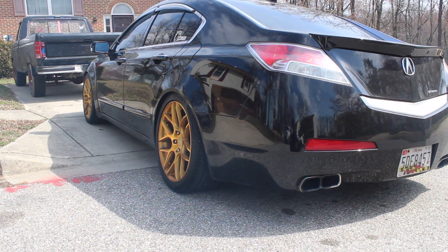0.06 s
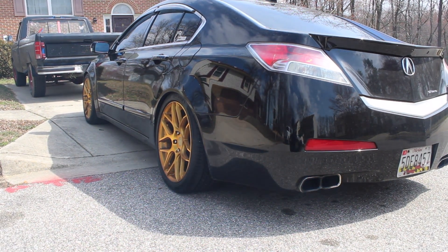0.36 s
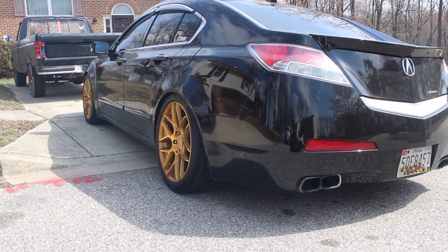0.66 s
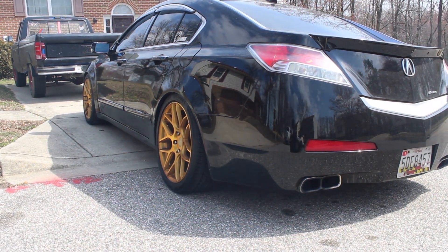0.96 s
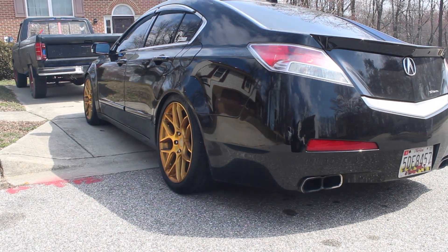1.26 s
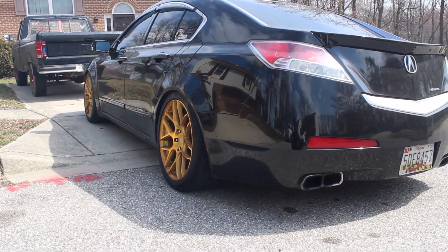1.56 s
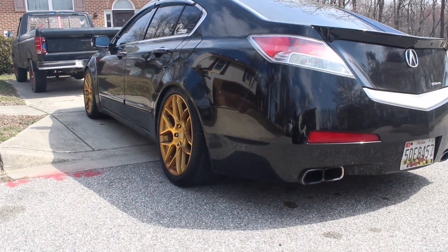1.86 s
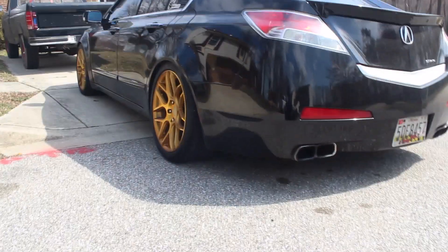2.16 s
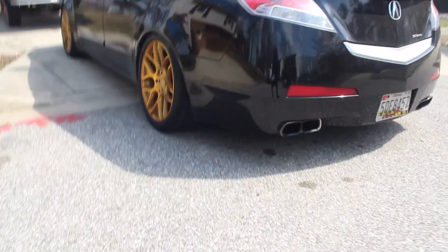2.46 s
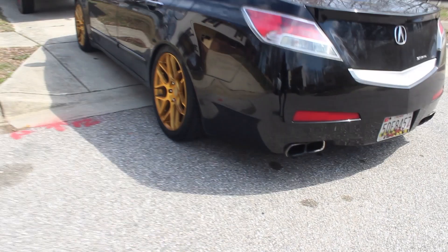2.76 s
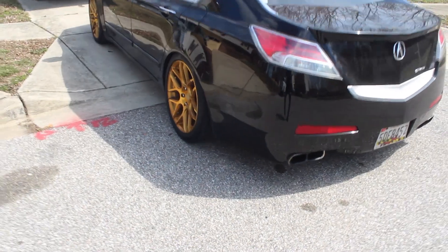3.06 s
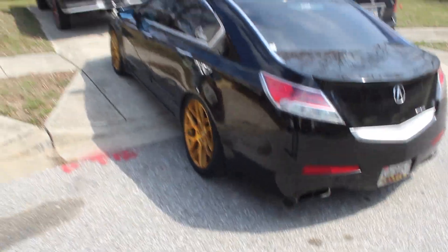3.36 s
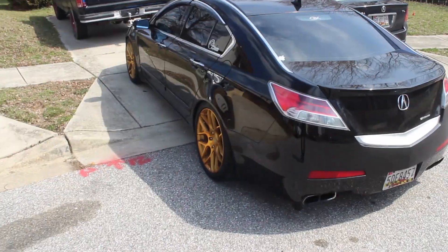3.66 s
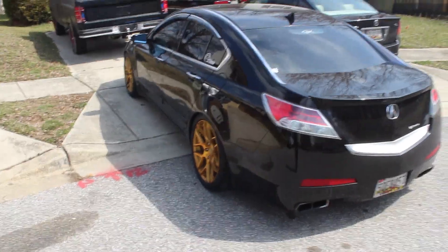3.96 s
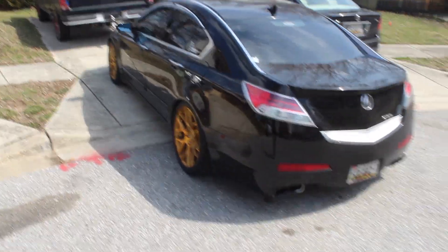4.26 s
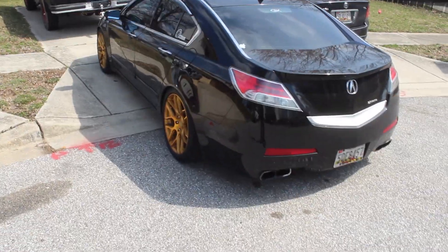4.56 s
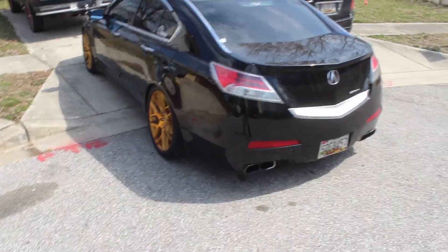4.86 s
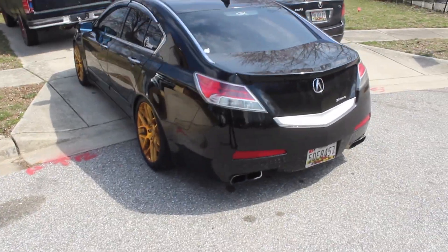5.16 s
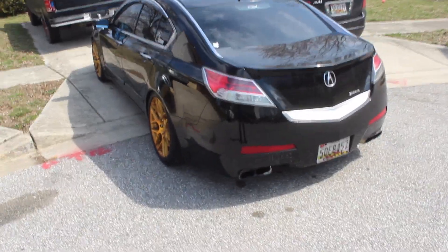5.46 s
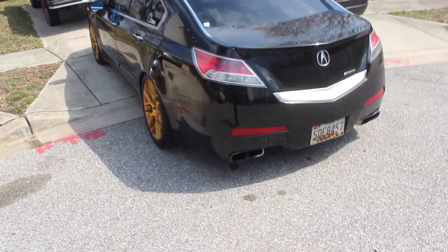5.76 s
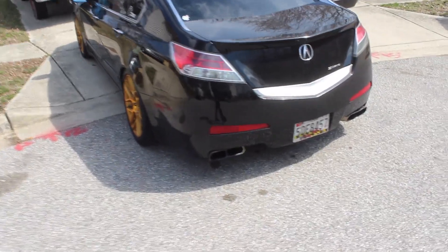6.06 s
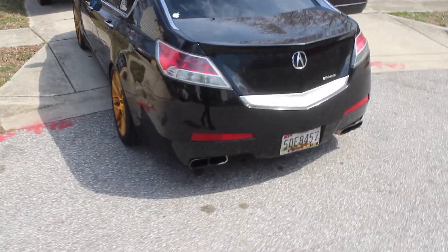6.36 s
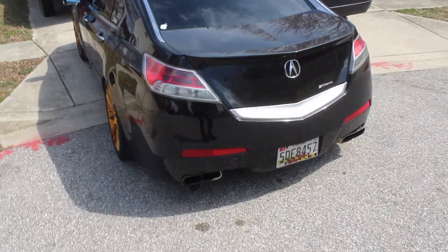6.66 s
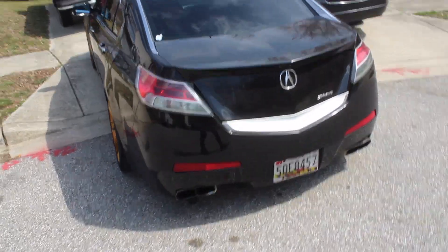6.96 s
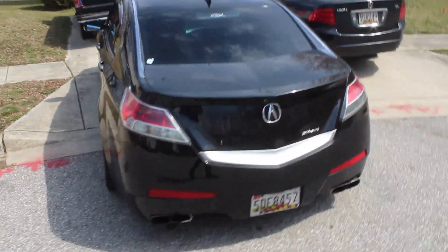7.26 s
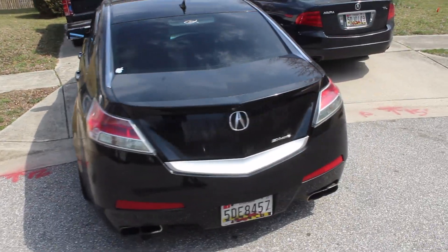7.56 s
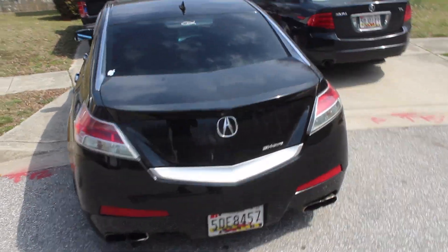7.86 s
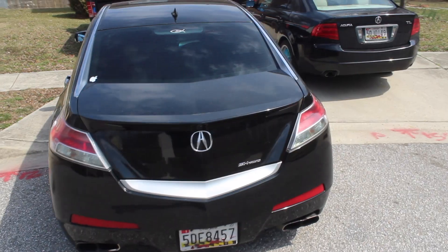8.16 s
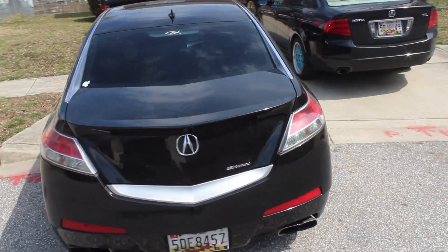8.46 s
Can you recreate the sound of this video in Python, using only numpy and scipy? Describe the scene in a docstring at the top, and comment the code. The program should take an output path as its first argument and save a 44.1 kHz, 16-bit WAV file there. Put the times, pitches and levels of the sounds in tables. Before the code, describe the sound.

A car with an open exhaust falls from a buzzy, crackling throttle blip, its pitch sinking as it goes softer. It catches with a few quick pops and settles into a deep, throaty, pulsing idle. The microphone moves from the side of the car to just behind the tailpipes, where the rasp and hiss get brighter and the chuffs harder. The street around it is quiet.

```python
"""On a quiet street, an open-exhaust V6 drops from a throttle blip, coasts and catches into a fast idle.
Each firing sends a pressure pulse down the pipes. The harmonics of this pulse train make a deep drone,
the pulses ring the modes of the pipes, and turbulent gas leaves the tips as rasp and hiss.
Late charges bang as the engine catches. The listener walks from the side, past the rear corner,
to right behind the tailpipes, where the gas sounds brighter and chuffs harder."""
import sys
import numpy as np
from scipy import signal
from scipy.fft import rfft, irfft, next_fast_len
from scipy.io import wavfile
from scipy.ndimage import uniform_filter1d, map_coordinates

SR = 44100
rng = np.random.default_rng(int(sys.argv[2]) if len(sys.argv) > 2 else 0)


def dump_mix(stems):
    """Bounce the given channels to the path in sys.argv[1] as a 16-bit WAV at rate SR."""
    frames = np.atleast_2d(stems).T  # one column per channel
    limited = np.clip(frames, -1, 1)  # hard clip at full scale
    pcm = np.round(limited * 32767).astype(np.int16)
    wavfile.write(sys.argv[1], SR, pcm)


N = 376173
TIME = np.arange(N) / SR

# The unequal cylinders in firing order: pulse_db, rasp_db, hiss_db, header_delay_s
CYLINDERS = [(0, 2, 15, 0), (-0.5, 0, -12.5, .0001), (-0.5, 0.5, 15, -.0001), (-4, -3.5, -18, .0001),
             (0.5, -2.5, 6, .0001), (-6.5, -2.5, -11, -.0001)]
PULSE_DB, RASP_DB, HISS_DB, HEADER_DELAY_S = np.transpose(CYLINDERS)
# Gas flow against idle, dying away after the blip and returning as the idle catches: time_s, flow_db
GAS_FLOW = [(0, 9.5), (.14, 5.5), (.3, 6.5), (.55, 3.5), (.66, 0), (.88, -5), (1.0, -14.5), (1.3, -10),
            (1.62, -4.5), (2.1, -1), (8.53, 1)]
# Spectra of rasp and hiss at the rear corner: frequency_hz, density_db
RASP_CORNER = [(410, -28), (700, -10), (900, -12.5), (1060, -13), (1200, -2.5), (1400, -2.5), (1700, -2),
               (2300, 1.5), (3600, -5), (4680, -36), (7920, -120)]
HISS_CORNER = [(1880, -30.5), (3200, -14.5), (4060, -2), (4820, -9.5), (5360, -2.5), (6070, -12),
               (6880, -7.5), (8560, -14), (10300, -35.5), (12500, -52), (15500, -84.5)]
LOUD_CYLINDER, LOUD_FIRING_S = 4, 5.879  # the cylinder that barks hardest, and one of its firings
FLARE_S = .0014  # build-up time of a puff of gas


def amp(db):
    """Decibels as an amplitude ratio."""
    return 10 ** (np.asarray(db) / 20)


def unit(x):
    """x scaled to rms 1."""
    return x / np.sqrt(np.mean(x ** 2) + 1e-20)


def steady(x):
    """x with its slow level held at rms 1."""
    power = uniform_filter1d(uniform_filter1d(x * x, SR // 10), SR // 10)
    return x / np.sqrt(np.abs(power) + 1e-20)


def curve(rows):
    """Rows of time_s, value interpolated to every sample."""
    return np.interp(TIME, *np.transpose(rows))


def ramp(start_s, length_s):
    """0 before the start, rising to 1 over the length."""
    return np.clip((TIME - start_s) / length_s, 0, 1)


def bell(x, centre, half_width):
    """A Gaussian bump of height 1."""
    return np.exp(-np.minimum(((x - centre) / half_width) ** 2 / 2, 20))


def wobble(rate_hz):
    """A smooth random curve with rate_hz knots a second."""
    at = np.arange(0, N, SR // 200)
    knots = rng.standard_normal(int(N * rate_hz / SR) + 4)
    return np.interp(np.arange(N), at, map_coordinates(knots, [at * rate_hz / SR]))


def filtered(x, response):
    """x through a complex frequency response."""
    size = next_fast_len(N + SR // 2)
    return irfft(rfft(x, size) * response(np.fft.rfftfreq(size, 1 / SR)), size)[:N]


def coloured(x, spectrum, size=8192):
    """x through a minimum-phase filter drawn as rows of frequency_hz, gain_db."""
    hz, db = np.transpose(spectrum)
    grid_hz = np.fft.rfftfreq(size, 1 / SR)
    gain_db = np.interp(np.log(grid_hz + 1), np.log(hz + 1), np.maximum(db, db.max() - 82.5))
    cepstrum = irfft(np.log(amp(gain_db)))
    cepstrum[1:size // 2] *= 2  # folding the cepstrum makes the filter causal
    cepstrum[size // 2 + 1:] = 0
    return signal.fftconvolve(x, irfft(np.exp(rfft(cepstrum))))[:N]


def viewpoints():
    """Crossfade weights of the side, the corner and behind as the listener walks."""
    # The walk: time_s, place (0 side, 1 corner, 2 or more behind)
    walk = [(0, 0.41), (1, 0.015), (4.4, 0.23), (5.4, 0.87), (6.1, 1.02), (6.7, 1.35), (7.7, 2.08),
            (8.53, 2.6)]
    place = np.clip(curve(walk), 0, 2)
    return [np.maximum(1 - np.abs(place - k), 0) for k in range(3)]


def conditions(surge_db, rise_s):
    """The state: flow in dB, then weights of coasting and of idle low and high at side, corner, behind."""
    idle = ramp(start_s=1.485, length_s=.66)
    high = ramp(rise_s, length_s=.22)  # the listening point is raised
    side, corner, behind = [idle * weight for weight in viewpoints()]
    flow_db = curve(GAS_FLOW) + surge_db
    return np.array([flow_db, 1 - idle, side * (1 - high), side * high, corner, behind])


def gain(levels, state):
    """Amplitude from a slope against gas flow and a level for each weight of the state."""
    return amp(np.dot(levels, state))


def pulses(firings, cylinder_db, scatter_db, jitter):
    """An impulse per firing, sized and delayed by its cylinder and by chance (jitter in intervals)."""
    number = np.arange(np.ceil(firings[0]), firings[-1]).astype(int)
    cylinder = number % len(CYLINDERS)
    timing, strength = rng.standard_normal((len(number), 2)).T
    fired_at = np.interp(number + jitter * timing, firings, np.arange(N))
    at = np.clip(fired_at + HEADER_DELAY_S[cylinder] * SR, 0, N - 2)
    size = amp(cylinder_db[cylinder] + scatter_db * strength)
    whole, fraction = at.astype(int), at % 1
    return np.bincount(whole, size * (1 - fraction), N) + np.bincount(whole + 1, size * fraction, N)


def drone(firings, rate_hz, state, travel_intervals=.68, lag_rad=1.51, waver_db=.66):
    """Resonance: the low orders of the pulse train swell as they cross the exhaust's standing waves."""
    # Standing waves of the whole exhaust: frequency_hz, half_width_hz, lift_db
    standing_waves = [(64.53, 5.18, 24), (103.54, 8.65, 17.5), (135.7, 9.7, 6), (164.6, 5.6, 5.5),
                      (220.4, 16, 9), (266.5, 9.5, 9.5), (306, 9.2, 6), (410, 26, 3)]
    # Multiples of the firing rate, the halves due to the two unequal banks: order
    orders = [1, 1.5, 2, 2.5, 3, 4]
    # Levels before the lift: db_per_flow_db, coast_db, side_low_db, side_high_db, corner_db, behind_db
    order_levels = [(0.54, -35.5, -40.5, -41, -36.5, -37.5), (0.16, -47.5, -62, -63, -58.5, -60),
                    (1, -37.5, -22, -23, -24, -31.5), (0.6, -52, -29, -27, -35.5, -32.5),
                    (0.19, -37, -26.5, -29, -24.5, -31), (0.26, -41, -28.5, -28.5, -25.5, -27)]
    # Single orders swelling briefly during the run-down, the catch and the early idle:
    # centre_s, half_length_s, order, level_db
    swells = [(0.37, 0.082, .5, -32), (0.26, 0.026, 2, -50), (0.777, 0.046, 2, -25),
              (0.743, 0.028, 3, -27.5), (0.853, 0.018, 3, -26), (0.894, 0.056, 4, -28),
              (1.095, 0.1, 5, -30), (1.397, 0.052, 3, -22), (1.53, 0.082, 2, -25.5), (1.82, 0.064, 4, -31),
              (1.74, 0.028, 6, -41), (2.7, .05, 8, -30)]

    def wave(order):
        return -np.sqrt(2) * np.cos(2 * np.pi * order * (firings - travel_intervals) - lag_rad)

    grid_hz = np.arange(SR // 40)
    lift_db = sum(db * bell(grid_hz, hz, width_hz) for hz, width_hz, db in standing_waves)
    stumble_db = 14 * bell(TIME, 1.41, .26)  # one bank lags, which lifts the half orders
    # the half orders fade through zero and invert as the one-bank chugging ends
    half_order_sign = 2 * ramp(start_s=1.69, length_s=.28) - 1
    out = np.zeros(N)
    for order, levels in zip(orders, order_levels):
        db = np.dot(levels, state) + np.interp(order * rate_hz, grid_hz, lift_db)
        imbalance = amp(stumble_db) * half_order_sign if order % 1 else 1
        out += amp(db + waver_db * wobble(15)) * imbalance * wave(order)
    for centre_s, half_length_s, order, db in swells:
        out += amp(db) * bell(TIME, centre_s, half_length_s) * wave(order)
    return out


def burble(firings, state):
    """Amplitude modulation: each charge burns a little stronger or weaker, which roughens the drone."""
    # Spectrum of the low boom: frequency_hz, density_db
    boom = [(25, -51), (45, -25.5), (62, 3.5), (85, -6), (112, -1.5), (165, -5.5), (220, 1.5), (270, -2),
            (400, -9), (800, -72.5)]
    # Its level: db_per_flow_db, coast_db, side_low_db, side_high_db, corner_db, behind_db
    levels = (-0.14, -31, -24, -28.5, -32, -30)
    kicks = pulses(firings, np.zeros(len(CYLINDERS)), scatter_db=-1.5, jitter=.02)
    uneven = kicks * rng.uniform(-.7, 1, N)
    return gain(levels, state) * steady(coloured(uneven, boom))


def throat(firings, state, band_hz=(272, 437)):
    """Impulse excitation: the uneven pressure pulses ring the lower pipe modes."""
    # Pipe resonances: frequency_hz, width_hz, relative_db
    modes = [(318, 25, -7), (384.2, 16, 0), (414.6, 61, 1), (453, 74, -3.5)]
    # Their joint level: db_per_flow_db, coast_db, side_low_db, side_high_db, corner_db, behind_db
    levels = (0.6, -30.5, -27.5, -35, -43, -35.5)

    def response(f):  # neighbouring modes alternate in sign
        return sum((-1) ** k * amp(db) * 1j * f * width / (hz * hz - f * f + 1j * f * width)
                   for k, (hz, width, db) in enumerate(modes))

    ring = filtered(pulses(firings, PULSE_DB, scatter_db=1.5, jitter=.017), response)
    band = signal.butter(3, band_hz, btype="band", fs=SR, output="sos")
    return gain(levels, state) * steady(signal.sosfilt(band, ring))


def ringing(drive, modes, state, db_per_flow_db):
    """Modal superposition: each narrow mode grows with gas flow and is heard best from its own place."""
    out = np.zeros(N)
    for hz, width_hz, *levels in modes:
        ring = drive
        for bandwidth_hz in (width_hz, 10 * width_hz):  # the wider pass steepens the skirts
            ring = signal.lfilter(*signal.iirpeak(hz, hz / bandwidth_hz, SR), ring)
        out += gain([db_per_flow_db, *levels], state) * steady(ring)
    return out


def bark(firings, state, accent_db=13):
    """Forced resonance: one cylinder strikes the middle pipe modes hardest; gas flow keeps them alive."""
    # Pipe modes: frequency_hz, width_hz, coast_db, side_low_db, side_high_db, corner_db, behind_db
    modes = [(515.3, 16.6, -35.5, -36, -36.5, -45, -47.5), (576.6, 24, -32, -36, -47, -37, -45.5),
             (635.4, 18, -45, -57, -58, -43, -45.5)]
    cylinder_db = accent_db * (np.arange(len(CYLINDERS)) == LOUD_CYLINDER)
    kicks = pulses(firings, cylinder_db, scatter_db=6.5, jitter=.0091)
    return ringing(steady(kicks) + 1.36 * rng.standard_normal(N), modes, state, db_per_flow_db=.66)


def pipe_ring(firings, state):
    """Standing waves: the pulses and gas ring narrow, metallic-sounding upper pipe resonances."""
    # Upper pipe modes: frequency_hz, width_hz, coast_db, side_low_db, side_high_db, corner_db, behind_db
    modes = [(801.6, 19, -50, -54, -42.5, -52, -55), (1018, 20, -41.5, -44, -44, -47.5, -53),
             (1147, 19, -45, -44, -49.5, -40, -46), (1284, 8.7, -48, -48.5, -53, -44, -48),
             (1492, 15, -45.5, -56, -46, -46.5, -42.5), (1614, 15, -54, -48, -53.5, -37, -52),
             (1855, 27, -65, -47.5, -60, -40, -41), (2166, 120, -49, -40, -51, -39, -43.5),
             (2634, 71, -55, -43.5, -54.5, -47.5, -68), (3440, 120, -62, -63, -51, -44, -42.5),
             (5420, 120, -69, -51, -54, -51, -52)]
    kicks = pulses(firings, RASP_DB, scatter_db=4.5, jitter=.0024)
    return ringing(steady(kicks) + rng.standard_normal(N), modes, state, db_per_flow_db=.82)


def fronts(firings, decay_s=.003, echo=.7, echo_s=.025, drift_hz=1.2):
    """Scattering: each cylinder's pressure front has its own impulse response, which slowly drifts."""
    kicks = pulses(firings, RASP_DB, scatter_db=.5, jitter=.0018)
    t = np.arange(SR // 25) / SR
    envelope = (np.exp(-t / decay_s) + echo * np.exp(-t / echo_s)) * (1 - np.exp(-t / FLARE_S))
    nearest_cylinder = np.round(firings) % len(CYLINDERS)
    out = np.zeros(N)
    for cylinder in range(len(CYLINDERS)):
        own_kicks = kicks * (nearest_cylinder == cylinder)
        angle = wobble(drift_hz)
        for share in (np.cos(angle), np.sin(angle)):  # equal-power blend of two responses
            out += signal.oaconvolve(own_kicks * share, envelope * rng.standard_normal(len(t)))[:N]
    return steady(out)


def puffs(kicks, decay_s, floor):
    """Pulsed turbulence: noise flares after each kick and sinks to a floor in between."""
    t = np.arange(SR // 20) / SR
    flare = signal.oaconvolve(kicks, np.exp(-t / decay_s) * (1 - np.exp(-t / FLARE_S)))[:N]
    return steady((steady(flare) + floor) * rng.standard_normal(N))


def slack(per_db=.3):
    """How far the gas flow has sunk below idle: the puffs then melt into a soft rush."""
    return np.maximum(-per_db * curve(GAS_FLOW), 0)


def mottled(x, depth_db):
    """Spectral fluctuation: each puff favours other pitches, in patches some 400 Hz by 25 ms."""
    spectrogram = signal.stft(x, nperseg=512)[2]
    patches = rng.standard_normal(spectrogram.shape)
    for _ in range(2):
        patches = uniform_filter1d(uniform_filter1d(patches, size=4, axis=0), size=4, axis=1)
    return signal.istft(spectrogram * amp(depth_db * unit(patches)), nperseg=512)[1][:N]


def lope(firings, swell_db=2.4, flutter_db=.6):
    """Amplitude modulation: the gas swells once an engine cycle, never quite alike."""
    cycle_rad = 2 * np.pi * (firings - LOUD_CYLINDER) / len(CYLINDERS)
    return amp(swell_db * np.cos(cycle_rad) + flutter_db * wobble(13))


def tailpipe(gas, spectra, echo, round_trip_hz):
    """Reflection and directivity: gas noise echoes faintly in the pipe; its colour depends on place."""
    echoed = filtered(gas, lambda f: 1 / (1 - echo * np.exp(-2j * np.pi * f / round_trip_hz)))
    return steady(sum(weight * unit(coloured(echoed, spectrum))
                      for weight, spectrum in zip(viewpoints(), spectra)))


def rasp(firings, front, state, shock=1.15):
    """Pulsed jet noise: each pulse leaves the tailpipe as a steep front and a puff of turbulence."""
    # Rasp spectra at the side and behind: frequency_hz, density_db
    side = [(410, -30.5), (700, 3), (900, 1.5), (1400, 2.5), (1770, 3.5), (2170, 3.5), (2700, -0.5),
            (3030, -9.5), (3600, -12.5), (4680, -30), (7920, -120)]
    behind = [(410, -25.5), (700, -18.5), (940, -6), (1260, -5.5), (1410, -8.5), (1520, -3.5), (2230, -2),
              (2400, -0.5), (3100, -6.5), (3600, -6.5), (4680, -24), (7920, -120)]
    # Rasp level: db_per_flow_db, coast_db, side_low_db, side_high_db, corner_db, behind_db
    levels = (1.07, -36.5, -38, -41.5, -28.5, -30)
    kicks = pulses(firings, RASP_DB, scatter_db=3, jitter=.0025)
    gas = shock * front + puffs(kicks, decay_s=.007, floor=.8 + slack())
    gas = mottled(gas, depth_db=3) * lope(firings)
    return gain(levels, state) * tailpipe(gas, [side, RASP_CORNER, behind], echo=.03, round_trip_hz=194.2)


def hiss(firings, front, state, shock=.7, even_above_hz=8500, even_share=.6):
    """Jet noise: the hiss pulses mostly with one bank, while its finest fizz streams on more evenly."""
    # Hiss spectra at the side and behind: frequency_hz, density_db
    side = [(1880, -35.5), (3200, -11), (3460, -7), (4010, -4.5), (4360, 0), (4790, -5), (5460, -0.5),
            (6110, -7), (7450, -5), (8790, -14.5), (11100, -37), (15500, -58.5)]
    behind = [(1880, -23), (3200, 2), (3820, -13), (4420, -2), (4820, -7), (5680, -3.5), (6480, -18.5),
              (7350, -13), (8120, -25.5), (9140, -23), (11300, -46.5), (13900, -66), (15500, -86)]
    # Hiss level: db_per_flow_db, coast_db, side_low_db, side_high_db, corner_db, behind_db
    levels = (1.26, -42.5, -41, -46.5, -35.5, -29)

    def even_power(f):
        return even_share * (1 - 1 / (1 + (f / even_above_hz) ** 8))

    kicks = pulses(firings, HISS_DB, scatter_db=3, jitter=.015)
    jets = shock * front + puffs(kicks, decay_s=.004, floor=1.1 + slack())
    pulsing = filtered(unit(mottled(jets, depth_db=2.5)), lambda f: np.sqrt(1 - even_power(f)))
    stream = filtered(rng.standard_normal(N), lambda f: np.sqrt(even_power(f)))
    gas = (pulsing + stream) * lope(firings)
    return gain(levels, state) * tailpipe(gas, [side, HISS_CORNER, behind], echo=.023, round_trip_hz=864)


def buzz(firings, state, surge_db, level_db=-38, db_per_flow_db=1.55, turbulence=.15):
    """Nonlinear steepening: under throttle the pulses become like shocks, a buzz crackling in surges."""
    # Spectra of the shock fronts and of their crackling top: frequency_hz, density_db
    shock_spectrum = [(450, -34.5), (850, -14), (1100, -1), (1600, 0), (2200, 7), (2900, -3), (4300, -10.5),
                      (5700, -16), (6300, -15), (7300, -10.5), (9000, -37), (11000, -44.5), (15500, -64)]
    crackle_spectrum = [(5000, -50), (8500, 1.5), (10000, 0.5), (12000, -11.5), (15500, -27)]
    kicks = pulses(firings, PULSE_DB, scatter_db=1, jitter=.0015)
    t = np.arange(SR // 100) / SR
    burst = rfft(np.exp(-t / .0014) * rng.standard_normal(len(t)))
    white_burst = irfft(burst / np.abs(burst))
    shocks = steady(signal.oaconvolve(kicks, white_burst)[:N])
    shocks += turbulence * puffs(kicks, decay_s=.002, floor=.4)
    body = steady(coloured(shocks, shock_spectrum))
    crackle = amp(-32 + 2 * surge_db) * steady(coloured(shocks, crackle_spectrum))
    flow_db, coasting = state[:2]
    return coasting * amp(level_db + db_per_flow_db * flow_db) * (body + crackle)


def street(level_db=-52):
    """Ambient noise: the faint rush of the neighbourhood."""
    # Background spectrum: frequency_hz, density_db
    spectrum = [(20, -15), (60, -22.5), (300, -25), (1000, 12), (4000, -33), (9000, -35.5), (14000, -57)]
    return amp(level_db) * unit(coloured(rng.standard_normal(N), spectrum))


def surges():
    """Transient modulation: rough moments shift the gas flow and the pipe ringing, both in dB."""
    # Rough moments: centre_s, half_length_s, flow_db, ringing_db
    moments = [(0.06, 0.05, 4.5, -16), (0.186, 0.023, 4.5, -17), (0.597, 0.017, 4.5, 5.5),
               (1.725, 0.037, 1, 9), (1.832, 0.021, -0.5, 9), (2.08, 0.018, 2.5, -2), (2.666, 0.011, 3, -9),
               (3.376, 0.046, 2, 1)]
    return sum(np.outer([flow_db, ringing_db], bell(TIME, centre_s, half_length_s))
               for centre_s, half_length_s, flow_db, ringing_db in moments)


def spits(rise_s=.0023, decay_s=.0035):
    """Turbulent bursts: now and then one puff cracks out harder than the rest."""
    # Spits of gas at the tailpipe: start_s, rasp_gain_db, hiss_gain_db
    events = [(.555, -16, -26), (.585, -16, -25), (.596, -16, -24), (3.548, -28, -29), (4.114, -21, -33),
              (5.506, -13.5, -24), (5.574, -14, -29), (5.881, -12, -25), (6.187, -11, -26),
              (6.81, -11.5, -24), (7.122, -13.5, -20), (7.784, -14.5, -21)]
    t = np.arange(SR // 30) / SR
    envelope = np.exp(-t / decay_s) * (1 - np.exp(-t / rise_s))
    body, fizz = np.zeros(N), np.zeros(N)
    for start_s, rasp_gain_db, hiss_gain_db in events:
        body[round(start_s * SR):][:len(t)] += amp(rasp_gain_db) * envelope
        fizz[round(start_s * SR):][:len(t)] += amp(hiss_gain_db) * envelope
    body *= unit(coloured(rng.standard_normal(N), RASP_CORNER))
    fizz *= unit(coloured(rng.standard_normal(N), HISS_CORNER))
    return body + fizz


def overtones(firings, state, dispersion_rad=.458, waver_db=1.8):
    """Periodic forcing: as the idle firms, the pipes lock into clean overtones that vary with place."""
    # Multiples of the firing rate: order
    orders = [22 / 6, 23 / 6, 4.5, 5, 5.5, 6, 6.5, 7, 7.5, 8, 10]
    # Their levels at idle: side_low_db, side_high_db, corner_db, behind_db
    order_levels = [(-30, -44, -47, -48), (-34, -34, -40, -40), (-37, -33, -38, -40), (-36, -37, -41, -30),
                    (-44, -44, -46, -40), (-37, -42, -37.5, -28), (-36, -37.5, -39, -35.5),
                    (-36.5, -41, -42, -32), (-39, -41, -49, -36.5), (-45, -55, -62, -46),
                    (-52, -54, -45, -56)]
    place_weights = state[2:]
    out = np.zeros(N)
    for order, levels in zip(orders, order_levels):
        rms = np.dot(amp(levels), place_weights) * amp(waver_db * wobble(8))
        out += np.sqrt(2) * rms * np.cos(2 * np.pi * order * firings - dispersion_rad * order ** 2)
    return out


def chuffs(firings, band_ratio=1.3):
    """Band-limited turbulence: a few puffs in a row rattle out harder around their own pitch."""
    # Runs of sharp puffs: centre_s, half_length_s, level_db, pitch_hz
    runs = [(1.6, .018, -36, 2260), (1.76, .014, -34, 2350), (1.855, .01, -37, 2230),
            (1.938, .008, -27, 2240), (2.04, .017, -31, 2210), (2.25, .009, -34, 2190),
            (2.292, .01, -33, 2070), (2.369, .011, -29.5, 2240), (2.455, .018, -31, 2430),
            (2.655, .02, -31, 2290), (2.969, .018, -33, 2200), (3.392, .015, -33, 1800),
            (3.718, .014, -37, 1790), (3.968, .011, -34, 2700), (4.225, .013, -34, 1740),
            (4.29, .02, -34, 2700), (4.402, .016, -32, 2900), (4.627, .016, -31, 2000),
            (4.824, .016, -31, 2390), (5.13, .018, -29, 2600), (5.676, .014, -26, 2020),
            (5.777, .016, -25, 2000), (5.98, .014, -24, 2100), (6.698, .012, -26, 2290),
            (7.226, .01, -26, 2260), (7.429, .013, -26, 2500), (7.641, .018, -25, 2240)]
    kicks = pulses(firings, RASP_DB, scatter_db=1.5, jitter=.01)
    gas = puffs(kicks, decay_s=.005, floor=.9)
    out = np.zeros(N)
    for centre_s, half_length_s, level_db, pitch_hz in runs:
        near = slice(round(centre_s * SR) - SR // 10, round(centre_s * SR) + SR // 10)
        edges_hz = [pitch_hz / band_ratio, pitch_hz * band_ratio]
        band = signal.butter(4, edges_hz, btype="band", fs=SR, output="sos")
        envelope = amp(level_db) * bell(TIME[near], centre_s, half_length_s)
        out[near] += envelope * unit(signal.sosfilt(band, gas[near]))
    return out


def bangs(ring_hz=390, rise_s=.001, decay_s=.0059):
    """Damped oscillation: a late charge goes off in the pipe with a brief, hard ring."""
    # Bangs as the engine catches: start_s, peak_db
    events = [(1.736, -12.5), (1.797, -15), (1.859, -14), (1.890, -15.5)]
    t = np.arange(SR // 30) / SR
    envelope = np.exp(-t / decay_s) * (1 - np.exp(-(t / rise_s) ** 2))
    ring = envelope * np.sin(2 * np.pi * ring_hz * t)
    out = np.zeros(N)
    for start_s, peak_db in events:
        out[round(start_s * SR):][:len(t)] += amp(peak_db) * ring / ring.max()
    return out


def scene(bark_surge=.34, hiss_surge=.92, exit_lag_intervals=.1):
    """Superposition: the count of firings times the exhaust; gas flow and place set its levels."""
    # Engine speed: time_s, firing_rate_hz
    speed = [(0.0, 162.5), (0.07, 156.3), (0.13, 147.8), (0.26, 135.5), (0.5, 107.7), (0.72, 87.6),
             (0.85, 74.8), (1.11, 74.7), (1.51, 69.9), (1.9, 63.8), (2.04, 60.6), (2.25, 59.39),
             (3.33, 59.23), (3.55, 58.05), (4.2, 57.98), (4.6, 58.16), (5.9, 58.62), (6.4, 58.26),
             (6.85, 57.13), (7.3, 57.71), (8.53, 57.46)]
    rate_hz = curve(speed)
    firings = np.cumsum(rate_hz) / SR
    firings = firings - firings[round(LOUD_FIRING_S * SR)] + LOUD_CYLINDER
    at_tip = firings - exit_lag_intervals
    surge_db, ringing_db = surges()
    state = conditions(surge_db, rise_s=3.29)
    mode_state = conditions(surge_db, rise_s=2.72)  # the modes shift as soon as the rise begins
    front = fronts(at_tip) / (1 + slack())
    low = drone(firings, rate_hz, state) + burble(firings, state) + overtones(firings, state) + bangs()
    pipes = amp(ringing_db) * throat(firings, state)
    pipes += amp(bark_surge * ringing_db) * bark(at_tip, mode_state)
    pipes += pipe_ring(at_tip, mode_state)
    gas = rasp(at_tip, front, state)
    gas += amp(hiss_surge * surge_db) * hiss(at_tip, front, state)
    gas += chuffs(at_tip)
    return (low + pipes + gas + buzz(at_tip, state, surge_db) + spits() + street())[None]


def record(dry, ceiling=.78, top_hz=15650):
    """Soft saturation rounds off the highest peaks, and a band limit removes the extreme treble."""
    rounded = dry[0] / (1 + (dry[0] / ceiling) ** 8) ** (1 / 8)
    fades = signal.windows.tukey(N, .0005)  # no click at either end
    return filtered(rounded * fades, lambda hz: hz < top_hz)[None]


dry = scene()
out = record(dry)
dump_mix(out)
```